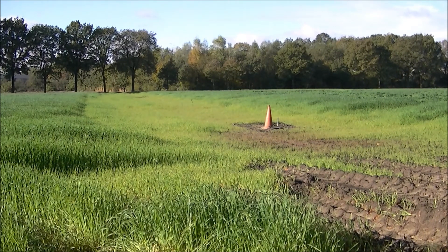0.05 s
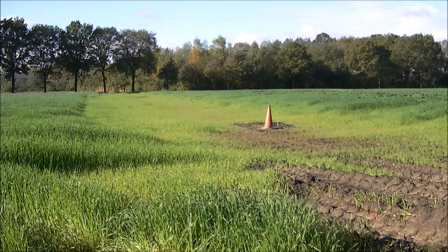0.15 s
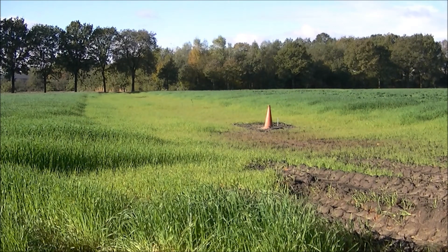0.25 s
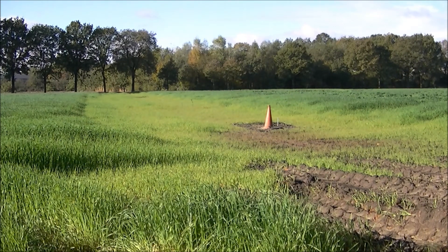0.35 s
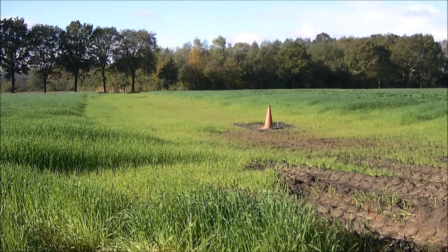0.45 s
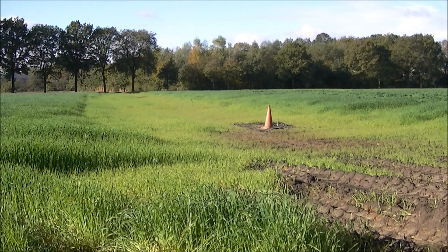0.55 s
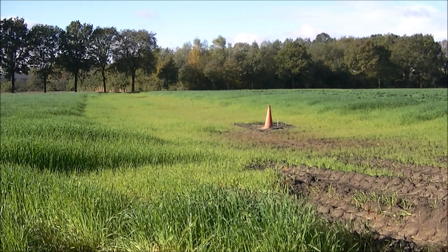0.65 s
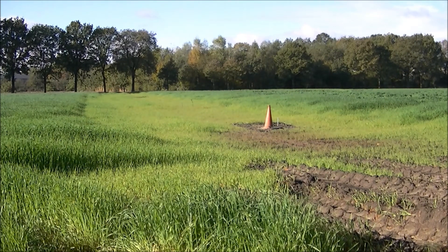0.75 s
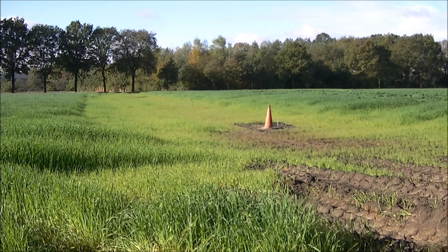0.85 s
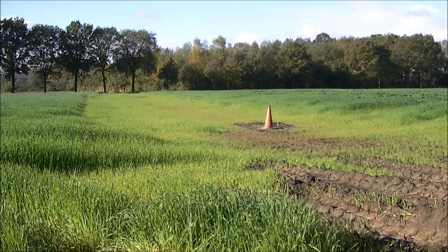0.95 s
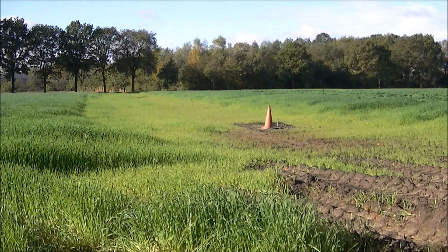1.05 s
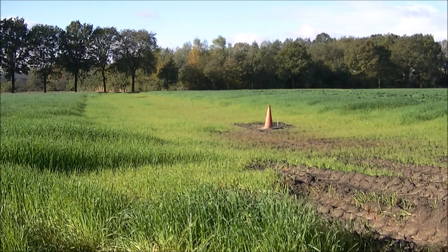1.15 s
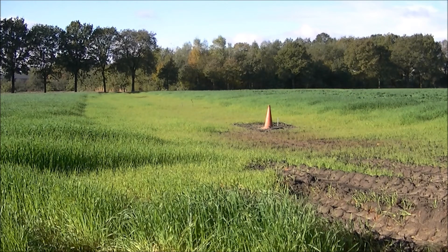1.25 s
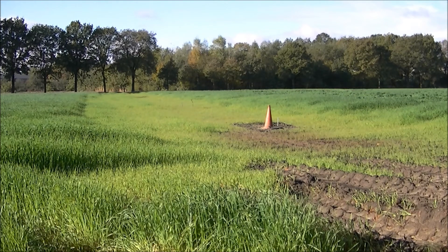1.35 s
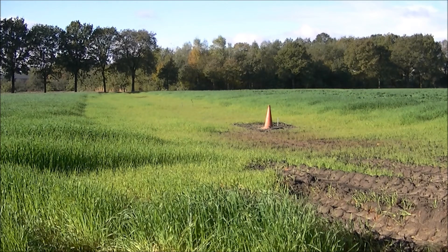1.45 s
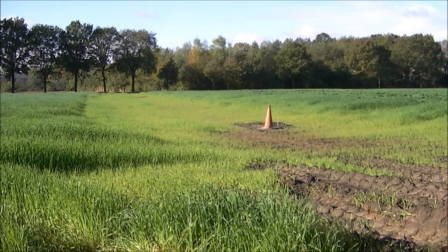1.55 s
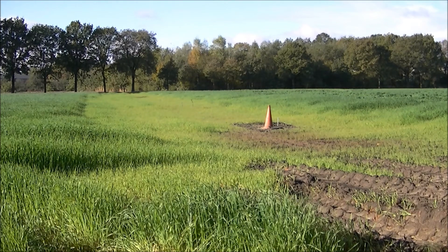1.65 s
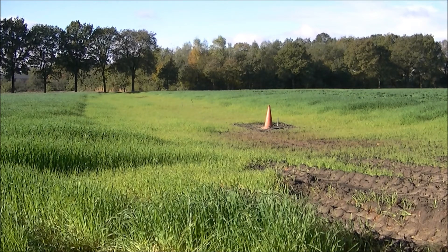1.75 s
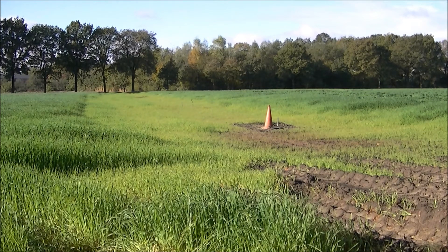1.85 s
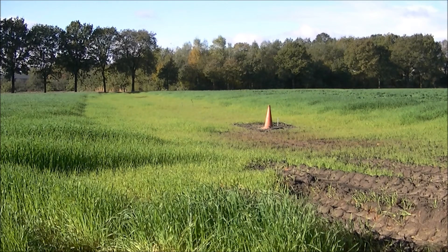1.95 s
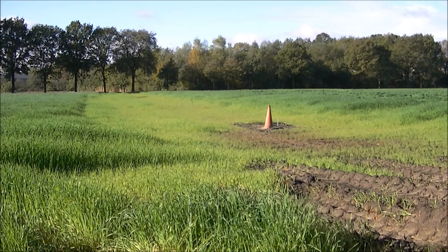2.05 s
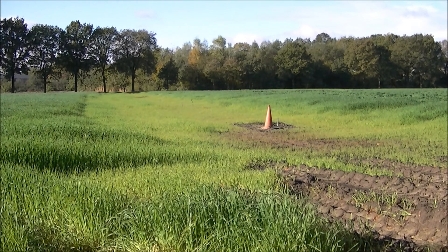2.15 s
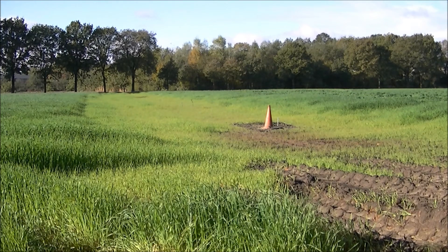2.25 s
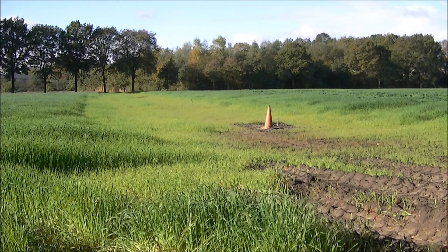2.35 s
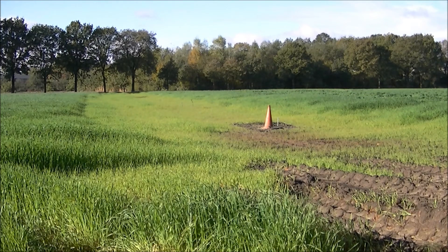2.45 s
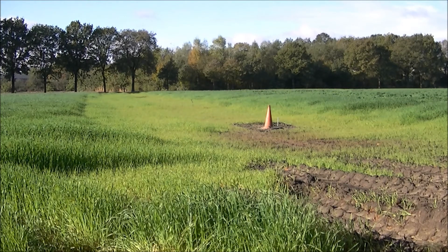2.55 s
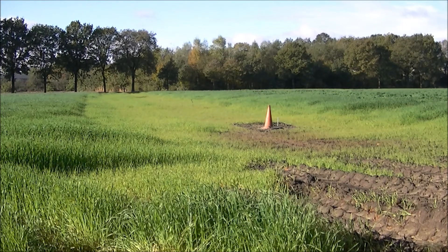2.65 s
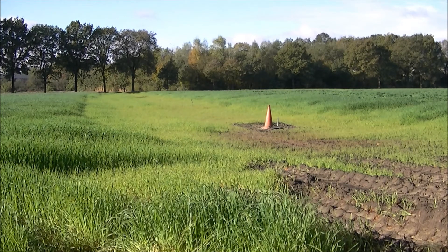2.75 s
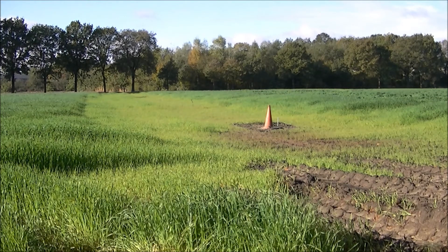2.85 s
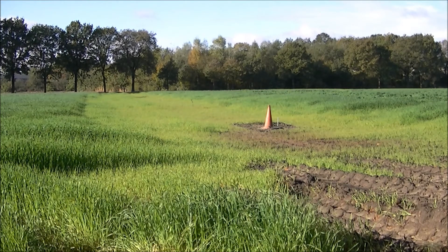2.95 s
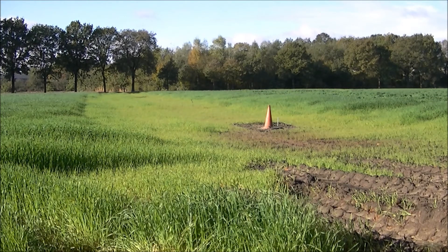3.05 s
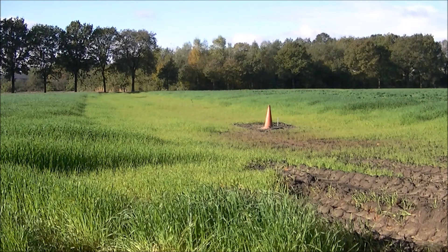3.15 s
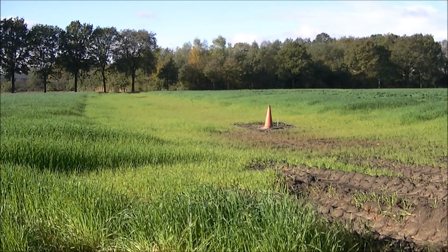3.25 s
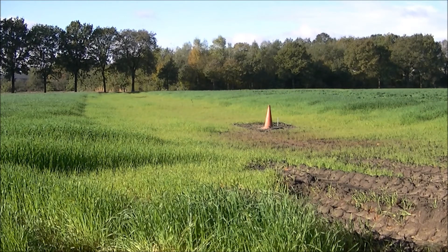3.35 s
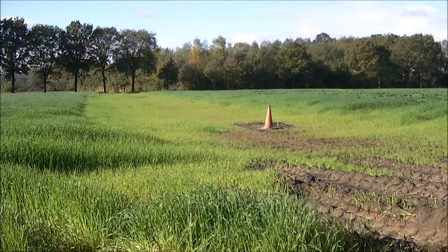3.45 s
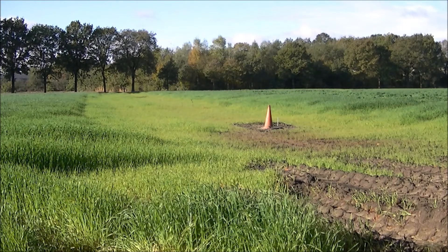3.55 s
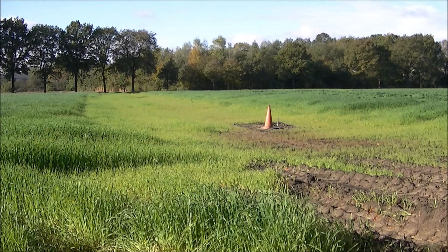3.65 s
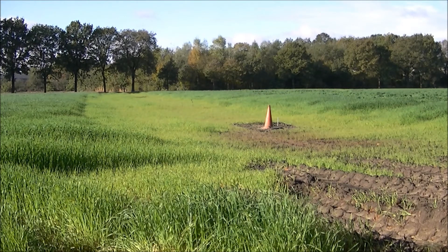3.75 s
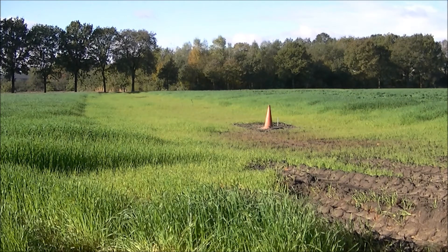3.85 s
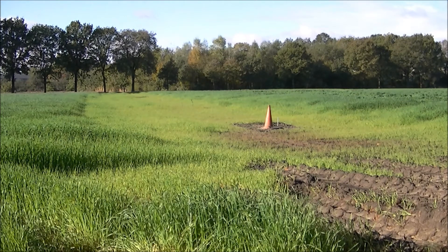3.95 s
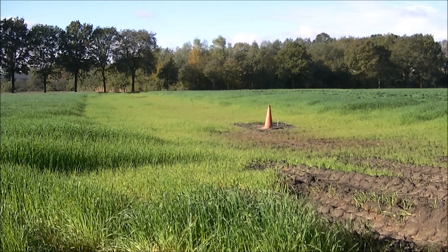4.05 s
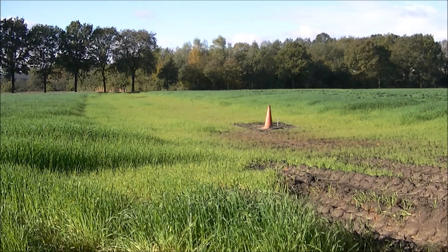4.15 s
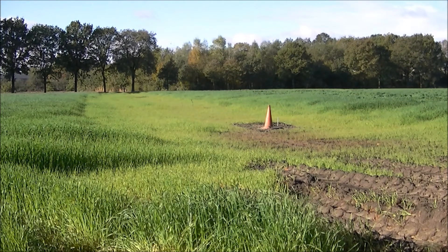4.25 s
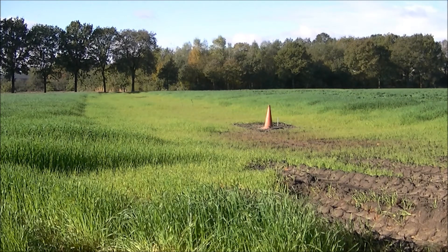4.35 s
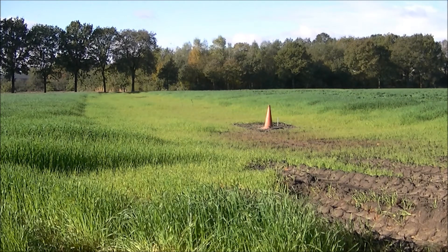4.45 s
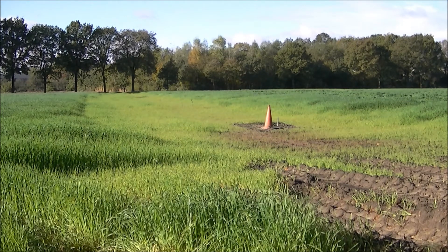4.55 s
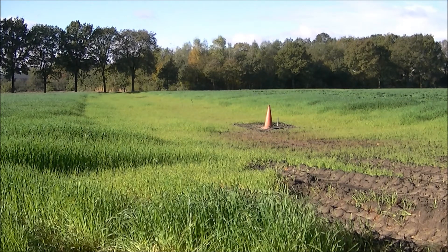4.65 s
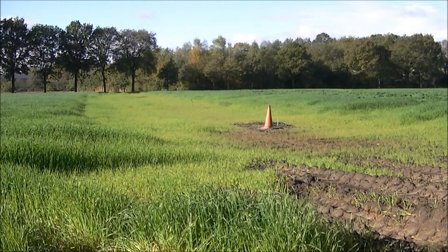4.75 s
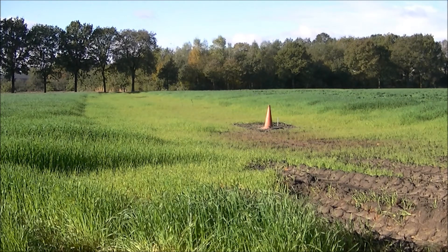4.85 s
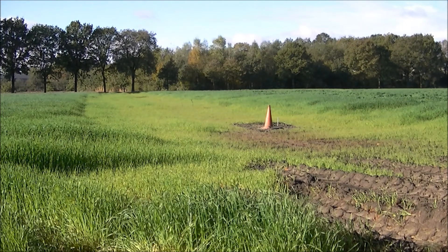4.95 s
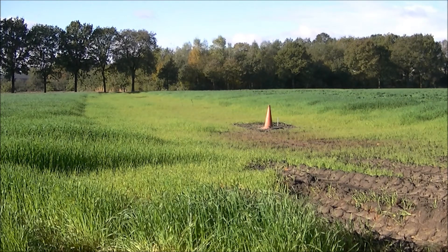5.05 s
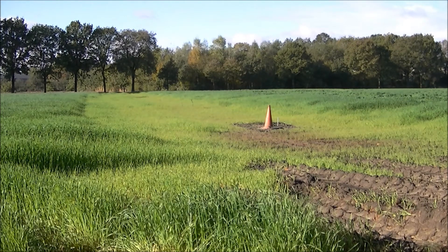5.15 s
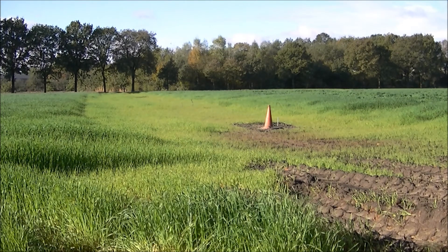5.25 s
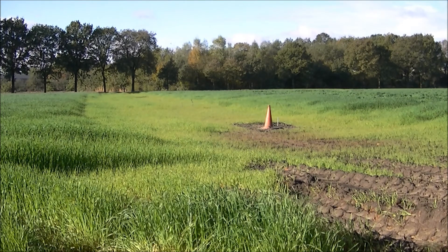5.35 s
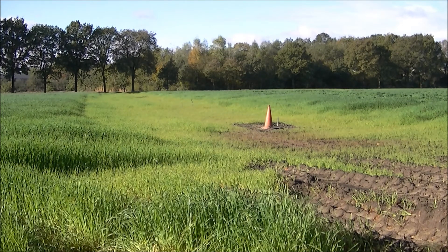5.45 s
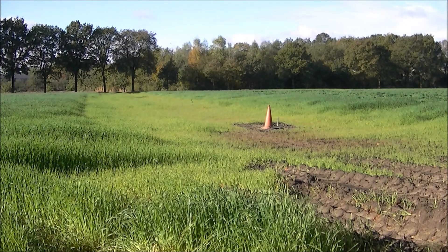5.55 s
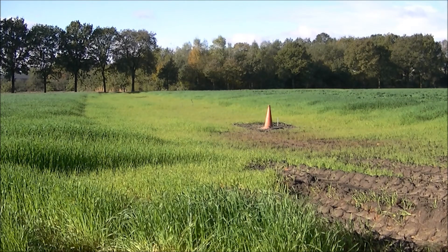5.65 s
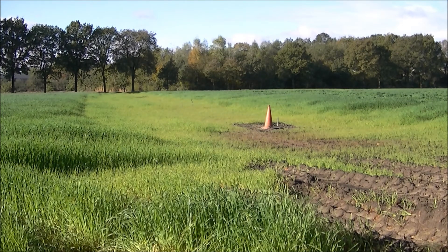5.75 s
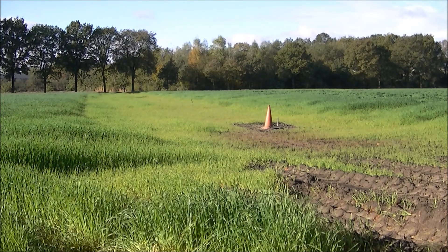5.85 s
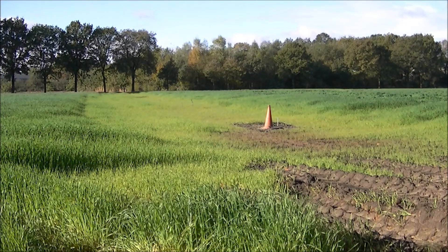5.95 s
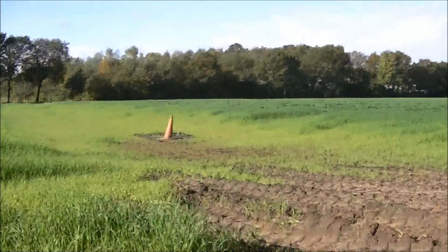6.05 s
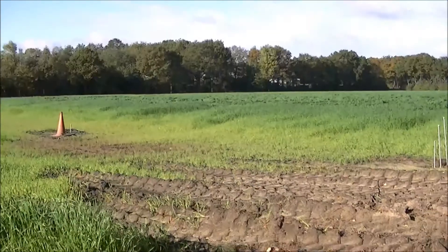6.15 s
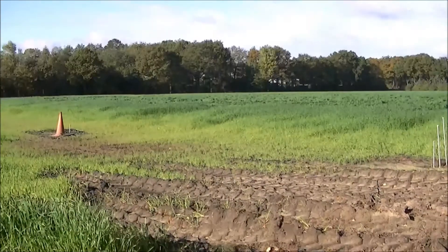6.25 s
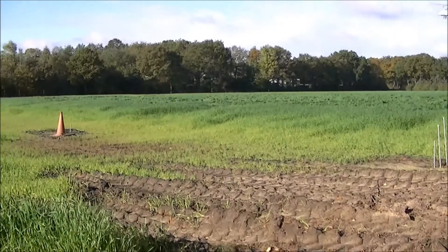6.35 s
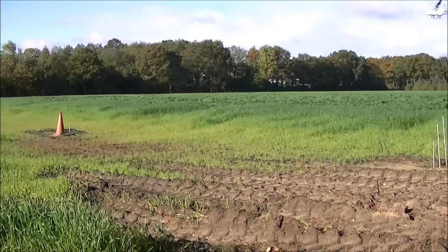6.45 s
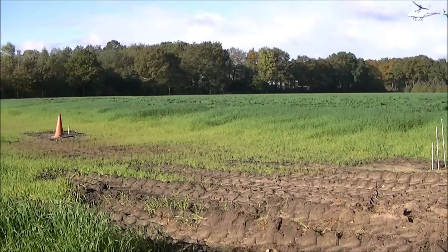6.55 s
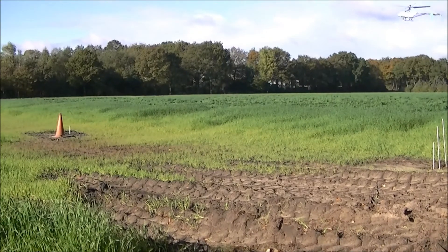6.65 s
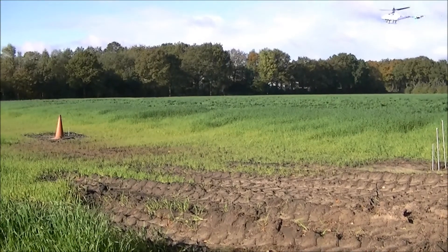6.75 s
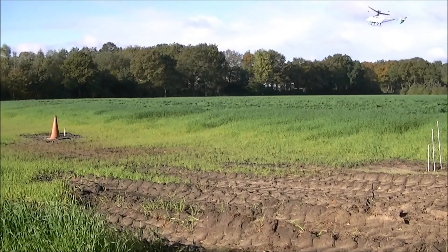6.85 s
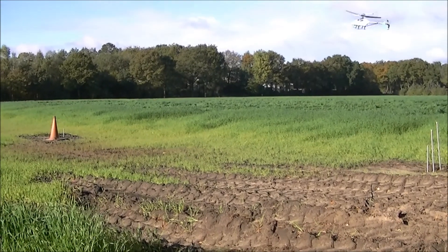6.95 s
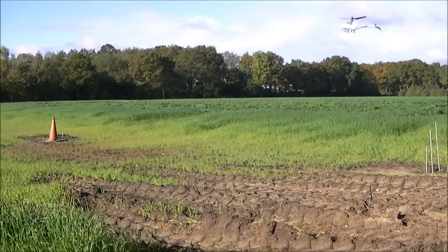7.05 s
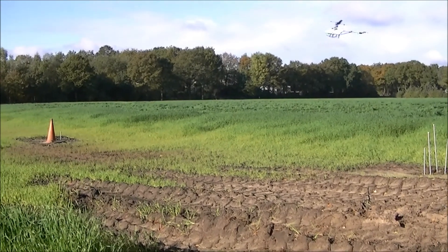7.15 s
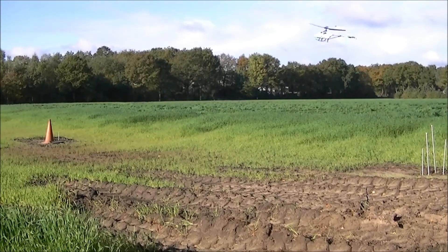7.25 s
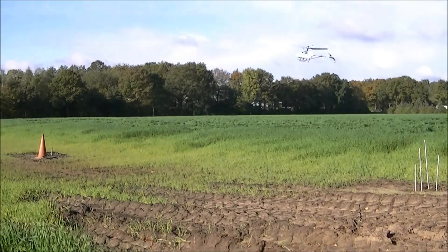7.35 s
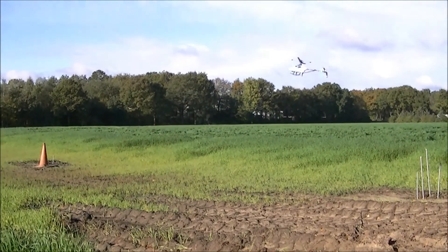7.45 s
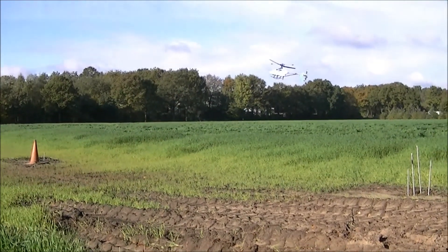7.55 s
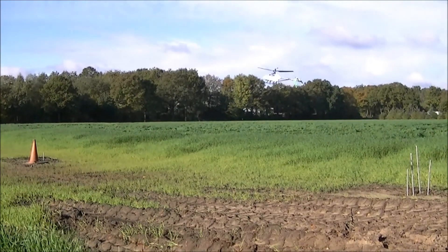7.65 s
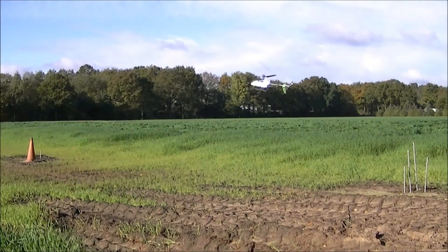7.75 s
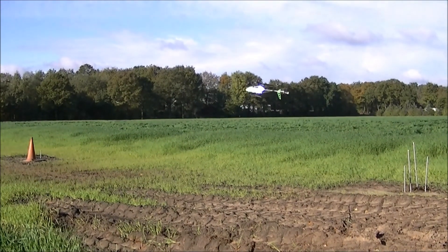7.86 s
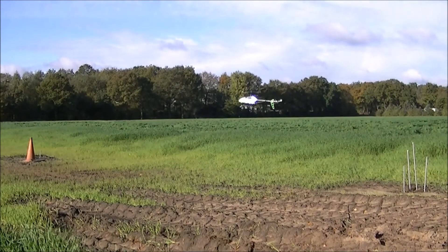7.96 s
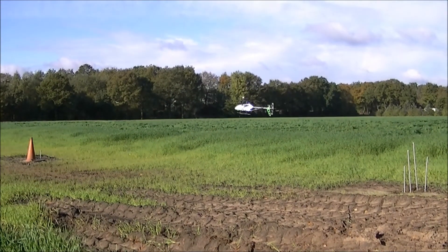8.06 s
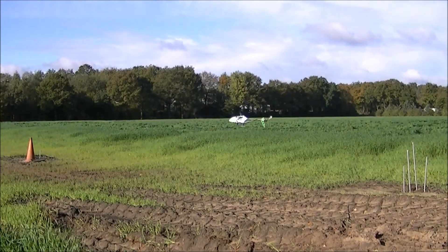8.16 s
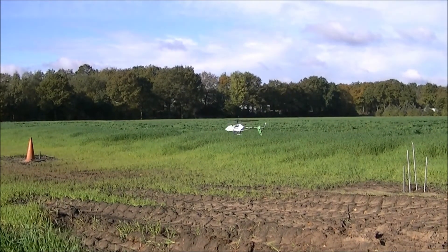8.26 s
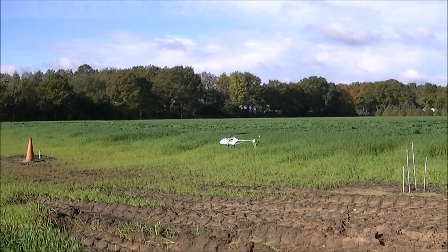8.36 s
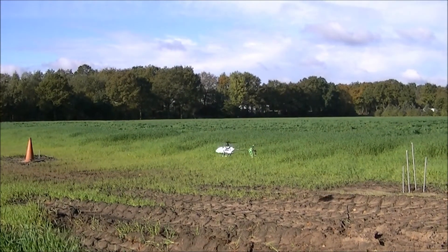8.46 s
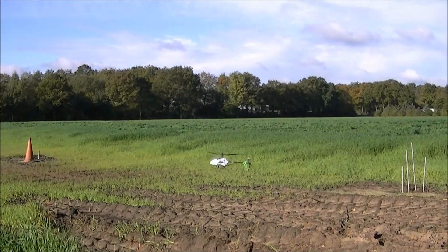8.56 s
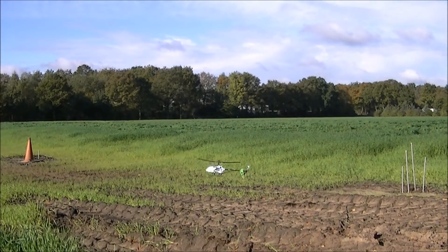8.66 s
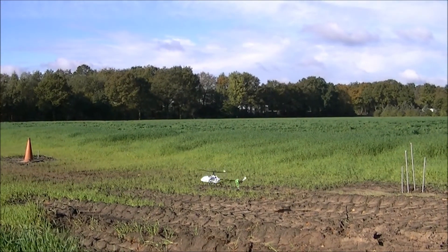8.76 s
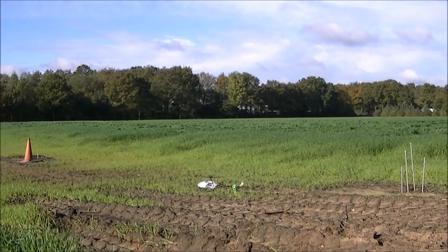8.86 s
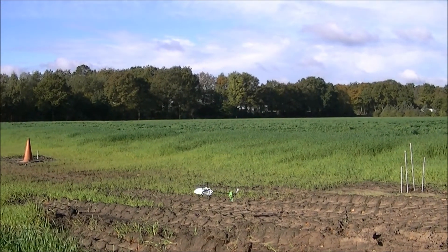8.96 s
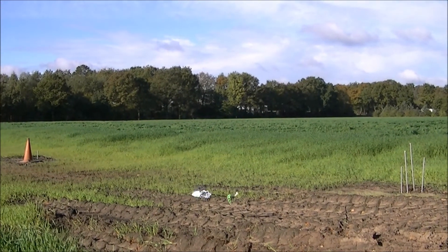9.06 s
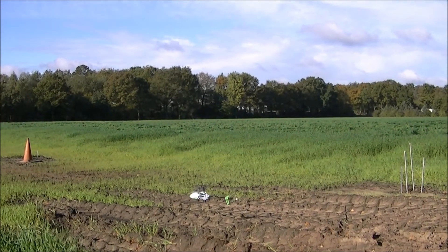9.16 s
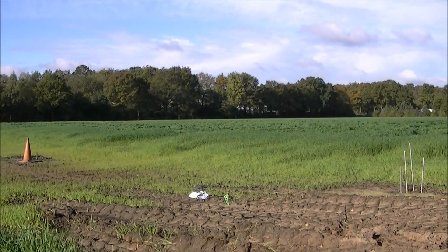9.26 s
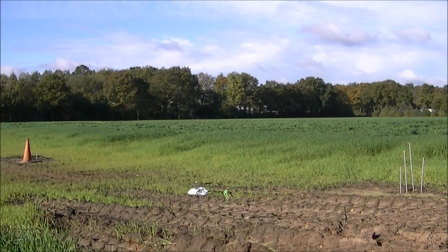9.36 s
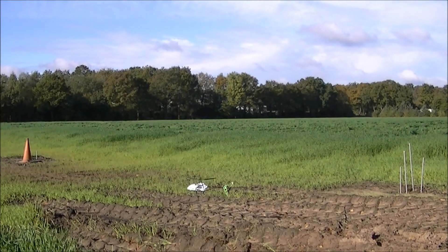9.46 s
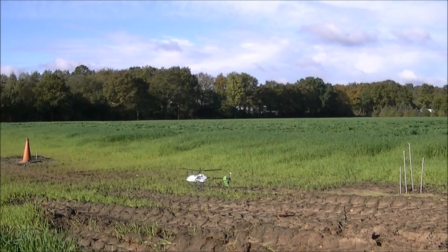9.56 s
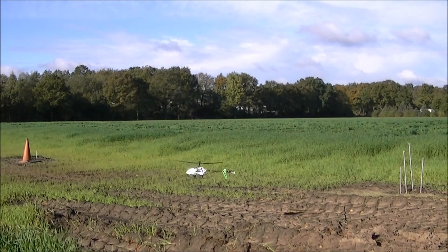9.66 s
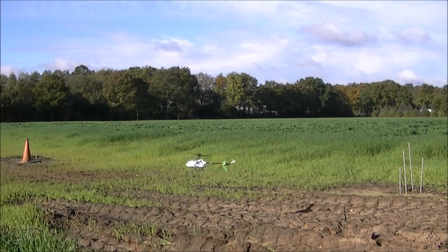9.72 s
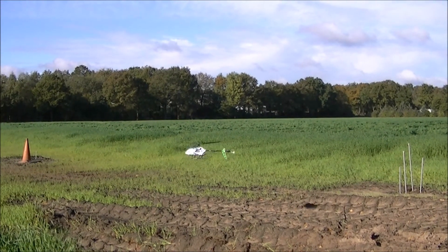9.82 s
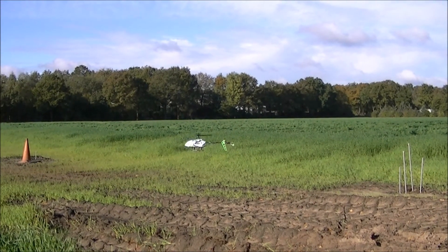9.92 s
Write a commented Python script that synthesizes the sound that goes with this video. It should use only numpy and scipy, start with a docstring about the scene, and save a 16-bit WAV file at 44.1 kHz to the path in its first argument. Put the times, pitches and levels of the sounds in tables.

```python
"""A small electric helicopter flies over a field, at first off to the right of a camera, for about ten seconds.
From the start the main motor and its gear whine, the tail motor hunts up and down, the blades churn the air
and the field rumbles low; soft bumps and rustles of handling come now and then.
At 6 s the camera clicks sharply as it is swung round; the model is then in front and comes closer.
Whines are sums of sine waves, air and scraping are filtered noise; a gain control ducks bursts and recovers."""
import sys
import numpy as np
from scipy import signal
from scipy.fft import rfft, irfft, next_fast_len
from scipy.io import wavfile
from scipy.ndimage import uniform_filter1d, map_coordinates

SR = 44100
rng = np.random.default_rng(int(sys.argv[2]) if len(sys.argv) > 2 else 0)


def waveform_to_disk(signal):
    """Save audio, clipped to [-1, 1], as 16-bit WAV at the path in sys.argv[1]."""
    frames = np.transpose(np.atleast_2d(signal))
    scaled = np.clip(frames, -1, 1) * 32767
    samples = np.round(scaled).astype(np.int16)
    wavfile.write(sys.argv[1], SR, samples)


N = 440559
TIME = np.arange(N) / SR


def undb(db):
    """Decibels to gain."""
    return 10 ** (np.asarray(db) / 20)


def unit(x):
    """Scale to an average strength (rms) of 1."""
    return x / np.sqrt(np.mean(x ** 2))


def curves(table):
    """The columns of a table, joined by straight lines in time."""
    seconds, *columns = np.transpose(table)
    return [np.interp(TIME, seconds, column) for column in columns]


def noise():
    """White noise: all pitches equally strong."""
    return rng.standard_normal(N)


def walk(rate):
    """Smooth random wandering with about rate new values a second; rms 1."""
    hold = max(int(SR / rate), 1)
    steps = np.repeat(rng.standard_normal(N // hold + 1), hold)
    smooth = uniform_filter1d(uniform_filter1d(steps, hold), hold)
    return unit(smooth[:N])


def spectrum_size(x):
    """A fast transform length for x, and the frequencies of its spectrum [Hz]."""
    size = next_fast_len(len(x), real=True)
    return size, np.maximum(np.arange(size // 2 + 1) * SR / size, 1)


def colour(x, points):
    """Filter by a curve of (frequency [Hz], gain [dB]) points."""
    size, f = spectrum_size(x)
    hz, db = np.transpose(points)
    gain = undb(np.interp(np.log(f), np.log(hz), db))
    return irfft(rfft(x, size) * gain, size)[:len(x)]


def band(x, hz, octaves):
    """Keep a bell-shaped band around hz, leaning to the low side; rms 1."""
    size, f = spectrum_size(x)
    bell = 1 + (np.log2(f / hz) / octaves) ** 2
    return unit(irfft(rfft(x, size) / bell / np.sqrt(f), size)[:len(x)])


def per_turn(turns, size):
    """A rough pattern that comes round again with every turn of a wheel."""
    pattern = rng.standard_normal(size)
    return unit(map_coordinates(pattern, [turns % 1 * size], order=3, mode="grid-wrap"))


def cycle(turns):
    """A sine wave over a phase counted in turns."""
    return np.sin(2 * np.pi * turns)


def tone(turns, flutter_db):
    """One sine tone of rms 1 that flutters in the moving air."""
    return unit(cycle(turns + rng.random()) * undb(flutter_db * walk(14)))


def swell(middle, length):
    """A smooth rise from 0 to 1 and back."""
    return np.cos(np.pi * np.clip((TIME - middle) / length, -.5, .5)) ** 2


MAIN_RATIO, MAIN_PINION = 14, 10  # motor turns per rotor turn; teeth on the motor's small gear (pinion)
HOVER_HZ = 310  # motor turns a second in hover
MESH_SIDE_DB_PER_HZ = 0.1341  # above hover speed the gear tone radiates more to the side
MESH_LULL_S, MESH_LULL_LENGTH_S, MESH_LULL_DB = 4.62, 0.57, -19  # the gear tone dips briefly
OVERTONE_DB_PER_HZ = 0.1058  # overtones grow stronger as the motor speeds up
HUM_FLUTTER_DB, OVERTONE_FLUTTER_DB = 1, 1.3
# wobble of the pinion [turns]: in hover, extra from the side,
# and change per Hz as the load presses the teeth together
PINION_WOBBLE, PINION_WOBBLE_SIDE, PINION_WOBBLE_PER_HZ = .012, .003, -.00012
# octave above the gear tone: level against the nearness, and shading from the side
OCTAVE_DB, OCTAVE_SIDE_DB = -12.5, -20
# main motor hum: (time [s], relative level [dB])
HUM_LEVEL = [(0, -35), (.1, -37), (.25, -46), (1.9, -35), (2.55, -37), (3, -43.5), (3.45, -43),
             (3.9, -49.5), (4.95, -29.5), (5.95, -45), (6.6, -29), (7.3, -36.5), (7.55, -41), (7.85, -34.5),
             (8.05, -36), (8.3, -29), (8.65, -30), (9.2, -40), (9.6, -31.5), (9.99, -29)]
# main gear's response to its tooth tone: (frequency [Hz], gain [dB])
GEARBOX = [(3000, -9.5), (3100, -10.5), (3170, -4.5), (3320, -4), (3560, -4.5)]
# motor overtones: (multiple of the shaft rate, relative level from ahead [dB], from the side [dB])
OVERTONES = [(2, -31.5, -28), (4, -21.5, -15), (5, -15.5, -14.5), (6, -28, -14.5), (7, -25, -20),
             (8, -31, -20), (9, -16, -28), (11, -24, -27), (13, -16.5, -22), (14, -22, -30), (15, -16, -24),
             (16, -20, -30), (17, -26, -32)]
# the airframe rings when an overtone slides into a resonance: (frequency [Hz], gain [dB])
FRAME = [(1230, -1.5), (1310, 5), (1420, -6), (1540, -3), (1680, -7.5), (1780, 1.5), (2100, -4),
         (4000, 1.5), (4300, -2), (4600, 0), (4750, 7.5), (4950, 0), (5100, 2.5), (5230, -14), (5350, 1.5),
         (5700, 0), (5950, -9), (6170, 1.5), (6550, -5), (6900, -10), (7100, 2)]


def main_drive(shaft, shaft_hz, near_db, bearing):
    """The three-pole motor hums; its pinion sings on a slightly off-centre main gear."""
    rotor, over_hz = shaft / MAIN_RATIO, shaft_hz - HOVER_HZ
    hum_db, = curves(HUM_LEVEL)
    mesh_db = near_db + np.interp(MAIN_PINION * shaft_hz, *np.transpose(GEARBOX))
    mesh_db += MESH_SIDE_DB_PER_HZ * bearing * np.maximum(over_hz, 0)
    mesh_db += MESH_LULL_DB * swell(MESH_LULL_S, MESH_LULL_LENGTH_S)
    octave_db = near_db + OCTAVE_DB + OCTAVE_SIDE_DB * bearing ** 2
    overtone_db = near_db + OVERTONE_DB_PER_HZ * over_hz

    off_centre = PINION_WOBBLE + PINION_WOBBLE_SIDE * bearing + PINION_WOBBLE_PER_HZ * over_hz
    wobble = cycle(rotor) + .3 * cycle(3 * rotor) + .25 * walk(120)
    armature = shaft + .006 * wobble
    pinion = MAIN_PINION * (shaft + off_centre * wobble)

    # the passing blades chop the sound
    hum = undb(hum_db + 1.07) * tone(3 * armature, flutter_db=HUM_FLUTTER_DB)
    hum *= 1 + 0.22 * cycle(2 * rotor) + 0.14 * walk(80)
    mesh = undb(mesh_db - 2.2) * tone(pinion, flutter_db=1) * (1 + 0.068 * cycle(2 * rotor))
    octave = colour(tone(2 * pinion, flutter_db=OVERTONE_FLUTTER_DB), FRAME)
    overtones = np.zeros(N)
    for multiple, ahead_db, side_db in OVERTONES:
        level_db = ahead_db + bearing * (side_db - ahead_db)
        overtones += undb(level_db) * tone(multiple * armature, flutter_db=OVERTONE_FLUTTER_DB)
    return hum + mesh + undb(octave_db) * octave + undb(overtone_db) * colour(overtones, FRAME)


TAIL_TEETH, TAIL_PINION = 60, 8  # teeth on the tail wheel and on its motor's pinion
TAIL_HOVER_HZ = 480  # tail motor turns a second in hover
# strength of the tail gear's shake: at rest, extra from the side, extra per Hz above hover speed
RATTLE, RATTLE_SIDE, RATTLE_PER_HZ = .75, .45, .0008
TAIL_THROB, TAIL_BLADE_FLUTTER_DB = .9, 4  # strength of the whine's pulsing; flutter of the blade tone
# tail gear's whine: (time [s], relative level [dB])
TAIL_WHINE = [(0, -49), (.5, -39.5), (.9, -39.5), (1.35, -44), (1.68, -49), (1.87, -37), (2.24, -49),
              (2.37, -34), (2.64, -35), (2.73, -52), (3.04, -47), (3.13, -31), (3.22, -31.5), (3.37, -47),
              (3.66, -42), (4, -45), (4.15, -35), (4.4, -37), (4.63, -45), (4.78, -37.5), (4.95, -32.5),
              (5.4, -31.5), (5.88, -28.5), (6.3, -37), (6.8, -29.5), (7.35, -28), (7.52, -29), (7.6, -25),
              (7.73, -28), (7.96, -22), (8.1, -26), (8.17, -25), (8.24, -28.5), (8.34, -25.5), (8.5, -33),
              (9, -32.5), (9.3, -37), (9.6, -33), (9.65, -27), (9.71, -29.5), (9.77, -23.5), (9.99, -24.5)]
# tail motor's hum: (time [s], relative level [dB])
TAIL_HUM = [(0, -55), (.3, -46), (.55, -39.5), (.85, -40), (1.15, -46), (1.7, -41), (2.1, -48), (2.5, -46),
            (2.8, -51), (3.2, -44), (3.6, -43), (3.9, -48), (4.3, -44), (4.8, -45), (5.3, -42), (6.3, -48),
            (7.4, -48), (8, -40), (8.5, -51), (9.99, -48)]
# tail gearbox's response to its whine: (frequency [Hz], gain [dB])
TAIL_GEARBOX = [(4200, 0), (4430, 2), (4620, -2), (4750, 5), (4880, -4), (5200, -4)]
# tail boom's response to its motor: (frequency [Hz], gain [dB])
BOOM = [(440, -38), (510, -10), (570, 1.5), (610, 3), (800, -1), (1300, -3), (1400, 2), (1520, -3),
        (1650, -7), (1850, -5.5), (2050, -0.5), (2400, -4)]


def tail_drive(motor, motor_hz, bearing):
    """A loose little gear shakes its whine once a turn into a cluster of tones, over the tail motor's hum."""
    (whine_db,), (hum_db,) = curves(TAIL_WHINE), curves(TAIL_HUM)
    teeth = TAIL_PINION * motor
    wheel = teeth / TAIL_TEETH
    armature = motor + .012 * walk(90)
    over_hz = np.maximum(motor_hz - TAIL_HOVER_HZ, 0)
    rattle = RATTLE + bearing * (RATTLE_SIDE + RATTLE_PER_HZ * over_hz)
    shaken = teeth + rattle * (.17 * cycle(wheel) + .07 * cycle(2 * wheel) + .035 * walk(280))
    throb = 1 + TAIL_THROB * (0.8 * cycle(wheel + 0.35) + cycle(2 * wheel))
    mesh = unit(tone(shaken, flutter_db=1.3) * throb)
    hum = tone(armature, flutter_db=3.0) + tone(3 * armature, flutter_db=2.5)
    hum += undb(-4.0) * tone(4 * armature, flutter_db=3.5)
    blades = undb(-29.5 - 24 * bearing) * tone(2 * wheel, flutter_db=TAIL_BLADE_FLUTTER_DB)
    return undb(whine_db) * (colour(mesh, TAIL_GEARBOX) + blades) + undb(hum_db) * colour(hum, BOOM)


# blade wash: (time [s], relative level [dB])
WASH_LEVEL = [(0, -29), (.15, -37), (1.9, -32), (2.5, -31.5), (3.5, -31), (4.1, -31.5), (4.5, -27),
              (4.8, -30), (5.85, -26.5), (6.25, -28.5), (6.8, -27), (8.4, -28.5), (9.5, -25.5), (9.99, -31)]
# colour of the wash: (frequency [Hz], relative level per Hz [dB])
WASH = [(60, -58), (200, -22.5), (380, -13), (490, -6), (650, -6), (800, -4.5), (950, 1), (1150, 0),
        (1600, 3.5), (2000, -0.5), (2500, -4), (4000, -9)]
# the blades' hollow whoosh: (time [s], level [dB])
WHOOSH_LEVEL = [(0, -40), (.2, -47.5), (1.9, -41), (2.6, -52), (3.5, -43.5), (4.5, -53.5), (5.8, -38),
                (7, -45.5), (8.1, -36.5), (9, -53.5), (9.99, -50)]


def blade_wash(rotor, bearing):
    """Churned air, partly the same on every turn, pulses with the rotor; it is fuller from straight ahead."""
    (wash_db,), (whoosh_db,) = curves(WASH_LEVEL), curves(WHOOSH_LEVEL)
    air = noise() + 0.33 * per_turn(rotor, size=600)
    air *= 1 + 0.059 * cycle(2 * rotor) + 0.24 * cycle(3 * rotor)
    body = undb(-19.0) * (1 - 0.91 * bearing) * band(air, hz=417, octaves=0.49)
    whoosh = undb(whoosh_db) * band(air, hz=681, octaves=0.38)
    flutter_db = 1.17 * walk(12)
    return undb(wash_db - 1.45 + flutter_db) * (unit(colour(air, WASH)) + body) + whoosh


# brush tone: strength against the scraping; random jitter and wobble of its phase [cycles]
BRUSH_SHARE, BRUSH_JITTER, BRUSH_WOBBLE = .13, .13, .22
# colour of the rasp: (frequency [Hz], relative level per Hz [dB])
RASP = [(1200, -17.5), (2500, -6.5), (3100, 3), (3400, 5), (3900, 4), (4400, 1), (5100, 4), (5700, 2),
        (6300, 1.5), (7200, 0), (9500, -7), (11000, -8.5), (12500, -2), (15800, -17)]
# the part of the rasp that the fuselage shades from the side: (frequency [Hz], gain [dB])
RASP_SHADE = [(3700, -36), (4400, -16), (7500, -17), (9500, -30)]


def gear_rasp(shaft, wheel, rasp_db, bearing):
    """Teeth and brushes scrape in step with the shafts and ring the motor can."""
    rotor = shaft / MAIN_RATIO
    scrape = noise() + 0.34 * per_turn(rotor, size=1700)
    scrape *= (1 + 0.26 * cycle(shaft) + 0.057 * cycle(2 * shaft)
               + 0.097 * cycle(rotor) + 0.051 * cycle(3 * rotor))
    scrape *= 1 + 0.11 * cycle(wheel) + 0.036 * cycle(2 * wheel)
    scrape *= undb(0.68 * walk(30))
    # the brush tone sings out only when the speed carries it into the can's resonance
    brush_turns = 2 * MAIN_RATIO * shaft + BRUSH_WOBBLE * cycle(rotor) + BRUSH_JITTER * walk(75)
    brushes = tone(brush_turns, flutter_db=4.5)
    can = band(scrape + BRUSH_SHARE * brushes, hz=9930, octaves=0.14)
    fizz = band(scrape, hz=14500, octaves=0.045)
    # the can beams forward, the finest fizz sideways; both swell faster than the rasp
    can_db = 8.5 + 1.56 * rasp_db - 8 * bearing
    fizz_db = 22.5 + 2.67 * rasp_db + 10 * bearing
    # the canopy rings towards the front
    canopy = undb(rasp_db - 16 - 40 * np.abs(bearing)) * band(scrape, hz=5620, octaves=0.016)
    rasp = unit(colour(scrape, RASP))
    rasp = rasp - bearing * colour(rasp, RASP_SHADE)
    return undb(rasp_db - 1.0) * rasp + canopy + undb(can_db) * can + undb(fizz_db) * fizz


# outdoor rumble: (time [s], level [dB])
RUMBLE = [(0, -51), (1, -49), (1.6, -46.5), (4.2, -50.5), (5.2, -53), (6.3, -55), (7.5, -54), (9.99, -51)]
# low outdoor drone: (time [s], level [dB])
DRONE_LEVEL = [(0, -64), (1.2, -57), (1.7, -50.5), (2.6, -56), (4.2, -58), (4.8, -53), (6.5, -56.5),
               (7.3, -59), (9.99, -59)]
# colour of the rumble: (frequency [Hz], relative level per Hz [dB])
FIELD = [(20, -30), (45, -30), (70, 3.5), (100, -4.5), (160, 0), (230, 1.5), (400, -4.5), (1000, -12),
         (8000, -24.5)]


def field():
    """A low rumble, partly alike in both ears, and a drone, separate in each, swell and sink."""
    common = noise()
    (rumble_db,), (drone_db,) = curves(RUMBLE), curves(DRONE_LEVEL)
    rumble = np.array([unit(colour(common + 1.14 * noise(), FIELD)) for _ in range(2)])
    drone = np.array([band(noise(), hz=157, octaves=0.13) for _ in range(2)])
    return undb(rumble_db) * rumble + undb(drone_db) * drone


def scatter(x):
    """Soil and crop throw back a faint, short, diffuse tail, made of fading noise."""
    t = TIME[:SR // 5]
    tails = rng.standard_normal((2, len(t))) * np.exp(-t / 0.027) * (t > .004)
    return np.array([signal.fftconvolve(x, tail / np.linalg.norm(tail))[:N] for tail in tails])


SCATTER_DRIFT_RATE = 6  # average turning between two patterns [radians/s]


def moving_scatter(x):
    """Two blended patterns of reflections keep changing as the model drifts over the ground."""
    turn = 2 * walk(SCATTER_DRIFT_RATE) + SCATTER_DRIFT_RATE * TIME
    return np.cos(turn) * scatter(x) + np.sin(turn) * scatter(x)


def microphones(x, bearing):
    """Sound from the right reaches the left port later, turned in phase and shaded in the mid range."""
    shade = [(300, -29), (1200, 2.5), (2000, -2.5), (4000, -24), (9000, -16)]
    left = x - bearing * colour(x, shade)
    left = np.real(signal.hilbert(left, next_fast_len(N))[:N] * np.exp(-.9j * bearing))
    delay = 6.2e-5 * bearing  # seconds
    left = map_coordinates(left, [(TIME - delay) * SR], order=3, mode="nearest")
    return np.array([left, x])


# soft handling bumps and rustles: (start [s], relative level [dB], centre [Hz], width [octaves], rise [s])
BUMPS = [(0.421, -36, 540, 0.16, 0.0063), (.862, -26, 1110, 0.8, 0.0055), (.93, -31, 9000, 1.5, .028),
         (1.003, -28.5, 1100, 0.6, 0.01), (1.021, -31, 9000, 1, 0.0055), (1.192, -22.5, 4630, 1.6, 0.012),
         (3.02, -35.5, 530, 0.17, 0.014), (4.205, -33, 540, 0.13, 0.013), (4.435, -32.5, 530, 0.36, 0.047),
         (4.53, -37, 1630, 0.037, 0.09), (7.145, -22, 1500, 0.83, 0.0063), (7.325, -21, 800, 0.81, 0.01),
         (7.677, -22.5, 915, 0.56, 0.009), (8.2, -32, 527, 0.2, 0.032), (5.245, -36, 440, 0.43, 0.013),
         (8.35, -18, 532, 0.14, 0.0088), (8.354, -17.5, 1620, 0.3, 0.0037)]


def bumps():
    """Dull bumps and brief rustles: bands of noise that swell and die away."""
    out, t = np.zeros(N), TIME[:SR // 3]
    for s, db, hz, octaves, rise in BUMPS:
        start = int(s * SR)
        shape = (t / rise * np.exp(1 - t / rise)) ** 2
        out[start:start + len(t)] += undb(db) * band(rng.standard_normal(len(t)), hz, octaves) * shape
    return colour(out, [(50, -16), (250, 0.5)])


# an airy low tone that comes and goes: (time [s], frequency [Hz], relative level [dB])
LOW_TONE = [(4.4, 490, -73), (5.3, 490.6, -47), (6, 496.5, -44.5), (6.3, 484.5, -42), (7.6, 501.5, -40),
            (8.2, 487, -55), (9.05, 539, -64), (9.2, 538, -40), (9.5, 541, -38.5), (9.7, 535, -70)]


def low_tone():
    """An airy, wavering tone under the whine: a sine wave with a jittery phase."""
    hz, db = curves(LOW_TONE)
    turns = np.cumsum(hz) / SR + 0.091 * walk(35)
    return undb(db) * tone(turns, flutter_db=2.0)


# ringing of the camera body: (frequency [Hz], relative level [dB], time to fade by 60 dB [s])
BODY = [(272, -15, 0.066), (819, 0.5, 0.073), (1090, 8, 0.049), (1250, -3, 0.064), (1680, 6.5, 0.029),
        (2170, -19, 0.033), (3400, -10, 0.038), (4800, -27, .03), (6240, -2.5, 0.033)]
# camera clicks: (start [s], body level [dB], crack level [dB], crack centre [Hz], crack width [octaves],
# crack decay [s], rocking level [dB], rocking frequency [Hz]); levels are relative
CLICKS = [(5.999, -17.5, -12.5, 2590, 1.7, 0.0091, -5.5, 256),
          (6.0477, -13, -8, 4400, 2, 0.0063, -1.5, 860), (6.088, -40, 0, 11600, 0.42, 0.0019, -23, 1100)]


def clicks():
    """Plastic parts snap: a crack and a short ring reach both capsules, which also rock in opposition."""
    out, t = np.zeros((2, N)), TIME[:SR // 4]
    for s, body_db, crack_db, hz, octaves, decay, rock_db, rock_hz in CLICKS:
        start = int(s * SR)
        rocking = undb(rock_db) * np.cos(2 * np.pi * rock_hz * t) * np.exp(-t / 0.006)
        for channel, sign in enumerate([1, -1]):
            ring = sum(undb(db - 60 * t / t60) * cycle(f * t + 0.57 * rng.random()) for f, db, t60 in BODY)
            crack = band(rng.standard_normal(len(t)), hz, octaves)
            crack *= np.exp(-t / decay) * (1 - np.exp(-t / 0.000064))
            body = (undb(body_db) * ring + sign * rocking) * (1 - np.exp(-t / 0.0011))
            out[channel, start:start + len(t)] += body + undb(crack_db) * crack
    return out


SCATTER_DB, WHINE_SCATTER_DB = -6, -6  # all reflections; those of the whine against the rushing air
# main motor speed, smoothed before use: (time [s], shaft turns a second [Hz])
SPEED = [(0.0, 311.4), (0.3, 299.0), (1.42, 306.5), (1.81, 313.9), (2.7, 330.8), (3.12, 334.5),
         (3.39, 355.7), (3.57, 354.8), (3.78, 339.3), (4.37, 320.2), (4.62, 327.3), (4.85, 319.0),
         (5.59, 309.7), (7.23, 307.2), (8.29, 306.9), (8.6, 337.0), (8.85, 352.3), (9.27, 356.3),
         (9.5, 356.6), (9.99, 315.9)]
# tail motor speed, hunting to hold the heading, smoothed before use: (time [s], shaft turns a second [Hz])
TAIL_SPEED = [(0, 450), (.28, 463), (.42, 450), (.56, 470), (.8, 468), (1.2, 452), (1.3, 472), (1.6, 493),
              (1.72, 510), (1.9, 477), (2.05, 485), (2.28, 512), (2.42, 556), (2.6, 568), (2.75, 510),
              (3, 505), (3.08, 558), (3.2, 572), (3.3, 603), (3.47, 612), (3.65, 580), (3.85, 490),
              (4.07, 530), (4.18, 585), (4.32, 597), (4.45, 565), (4.65, 415), (4.8, 500), (4.95, 468),
              (5.17, 488), (5.33, 455), (5.52, 477), (5.7, 469), (6.9, 465), (7.52, 469), (7.58, 497),
              (7.66, 501), (7.73, 480), (7.82, 479), (7.98, 496), (8.1, 489), (8.2, 462), (8.36, 505),
              (8.45, 550), (8.7, 566), (9.05, 562), (9.2, 541), (9.57, 543), (9.68, 465), (9.74, 467),
              (9.81, 479), (9.92, 473), (9.99, 478)]
# flight path: (time [s], relative level from nearness [dB])
NEARNESS = [(0, -35), (2, -32.5), (2.5, -31.5), (3.4, -29.5), (3.9, -32.5), (4.6, -28.5), (5.9, -27),
            (6.6, -26.5), (8.3, -25), (8.6, -22.5), (9.5, -22.5), (9.99, -25.5)]
# direction of the model: (time [s], bearing [1 far right, 0 straight ahead])
BEARING = [(0, 0.87), (6, 0.88), (6.3, 0.39), (7, 0.34), (7.6, 0.18), (10, -0.17)]


def scene():
    """The helicopter at its bearing, the handled camera and the open field."""
    shaft_hz = uniform_filter1d(curves(SPEED)[0], SR // 12)
    tail_hz = uniform_filter1d(curves(TAIL_SPEED)[0], SR // 20)
    (near_db,), (bearing,) = curves(NEARNESS), curves(BEARING)
    # adding up the speeds gives the turns made so far
    shaft = np.cumsum(shaft_hz * (1 + 0.000612 * walk(12))) / SR
    tail = np.cumsum(tail_hz * (1 + .002 * walk(20))) / SR
    tail_wheel = tail * TAIL_PINION / TAIL_TEETH

    whine = main_drive(shaft, shaft_hz, near_db, bearing) + tail_drive(tail, tail_hz, bearing) + low_tone()
    rush = blade_wash(shaft / MAIN_RATIO, bearing) + gear_rasp(shaft, tail_wheel, near_db, bearing) + bumps()
    ground = undb(SCATTER_DB) * moving_scatter(rush + undb(WHINE_SCATTER_DB) * whine)
    snaps = clicks()
    snap_tail = undb(-8.5) * scatter(snaps[1])
    return microphones(whine + rush, bearing) + ground + snaps + snap_tail + field()


AGC_THRESHOLD_DB, AGC_ATTACK_S, AGC_RELEASE_DB_PER_S = -14.5, 0.014, 1.84


def gain_control(x):
    """The camera's gain control: a loud burst quickly turns the gain down; it creeps back over seconds."""
    power = uniform_filter1d(np.mean(x ** 2, axis=0), SR // 160)
    level_db = 10 * np.log10(power + 1e-12)
    recovery = AGC_RELEASE_DB_PER_S * TIME
    excess_db = np.maximum(level_db - AGC_THRESHOLD_DB, 0)
    cut_db = np.maximum.accumulate(excess_db + recovery) - recovery
    step = 1 / (AGC_ATTACK_S * SR)
    return x * undb(-signal.lfilter([step], [1, step - 1], cut_db))


TOP_HZ = 15950  # sound above this is cut steeply


def record(dry):
    """Each capsule has its own tone; then the gain ducks, peaks are clipped and the top is cut."""
    left = colour(dry[0], [(20, -16), (60, -8.0), (100, -3.5), (500, -5.5), (1500, -0.5), (5000, -2.5),
                           (10300, -1.5), (12500, -5.5)])
    right = colour(dry[1], [(20, -18), (60, -2.0), (500, -2.0), (1500, -0.7), (5000, 2.5),
                            (10300, 1.0), (12500, -6.0)])
    clipped = np.clip(gain_control(np.array([left, right])), -1, 1)
    top_cut = signal.ellip(10, .2, 70, TOP_HZ, fs=SR, output="sos")
    return signal.sosfilt(top_cut, clipped)


dry = scene()
out = record(dry)
waveform_to_disk(out)
```